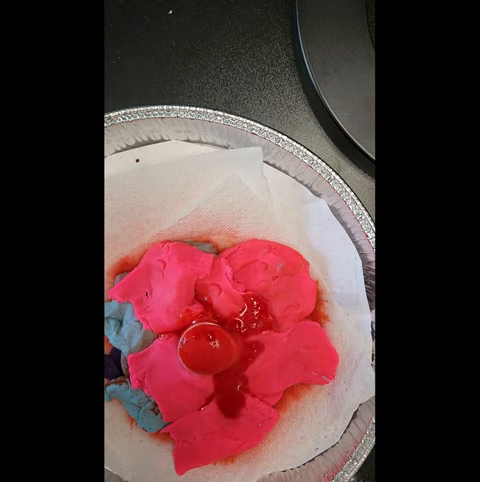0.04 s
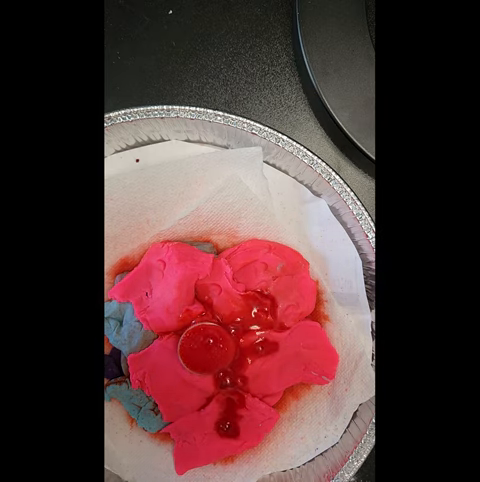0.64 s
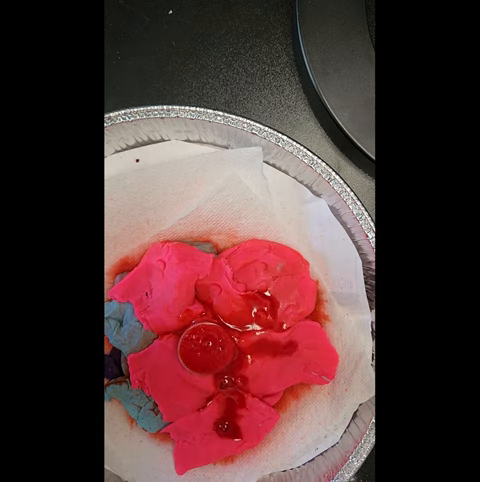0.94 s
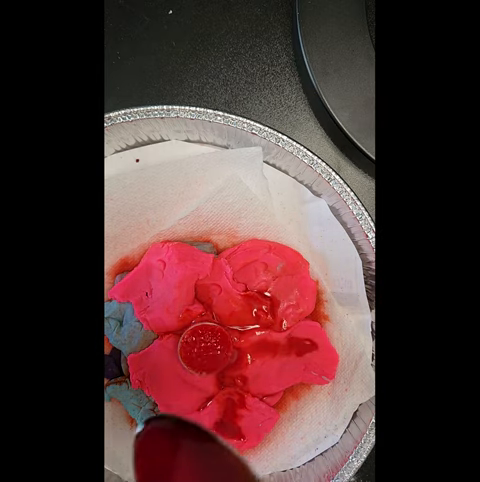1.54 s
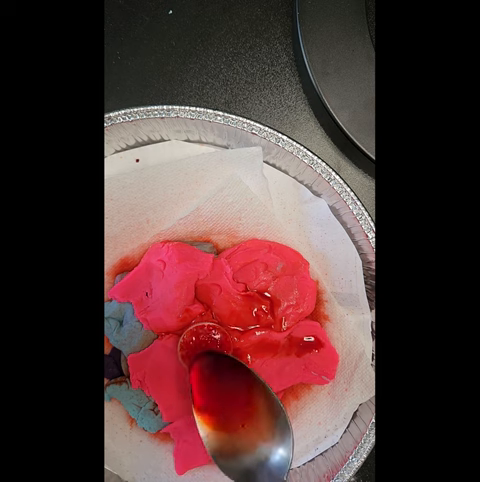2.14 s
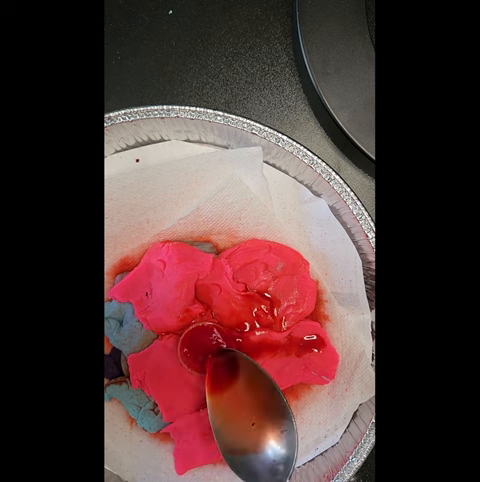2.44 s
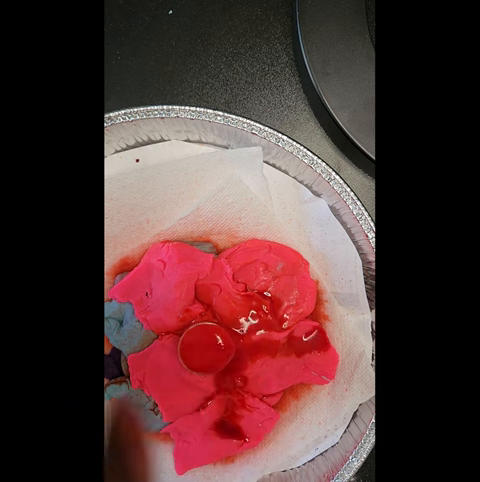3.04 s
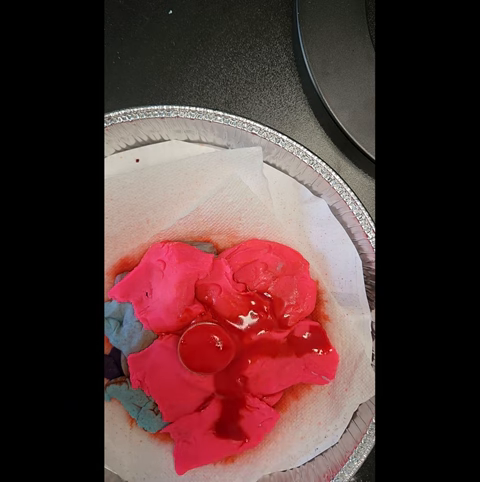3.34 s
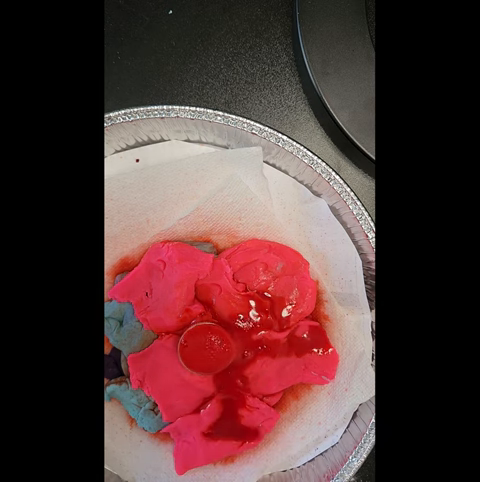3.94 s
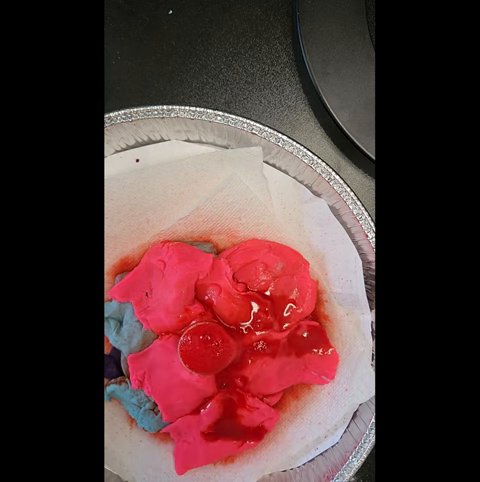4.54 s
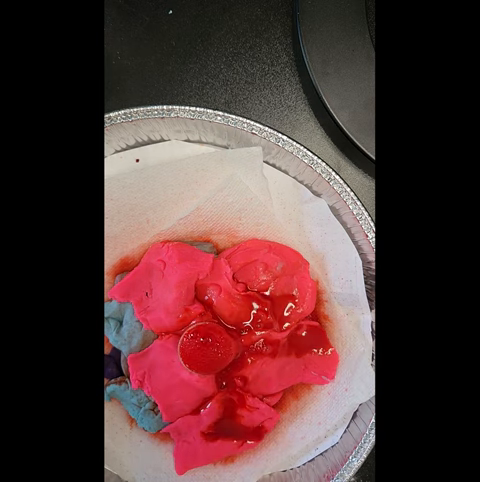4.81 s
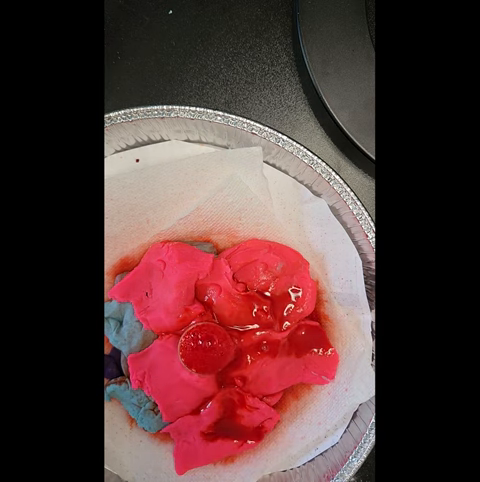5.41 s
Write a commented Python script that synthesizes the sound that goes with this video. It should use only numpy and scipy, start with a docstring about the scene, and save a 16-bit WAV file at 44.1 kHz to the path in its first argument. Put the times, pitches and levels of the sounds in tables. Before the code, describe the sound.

Foam fizzes softly, fading and building again, while a metal spoon is picked up and put down and the table is knocked.

```python
"""Baking soda and vinegar fizz in a small cap and on the dough around it, close to a mono microphone.
Each spoonful builds up and fades, fine bubbles first; the cap falls quiet while the spoon lies over it.
The steel spoon clinks as it is picked up from the tabletop and is laid down again with a clatter.
Things are nudged and slid on the table. The place is a small room with a low appliance hum."""
import sys
import numpy as np
from scipy import signal
from scipy.fft import rfft, irfft, next_fast_len
from scipy.io import wavfile
from scipy.ndimage import map_coordinates

SR = 44100
rng = np.random.default_rng(int(sys.argv[2]) if len(sys.argv) > 2 else 0)


def unload_wav(signal):
    """Save mono or channel-first audio to the path in sys.argv[1] as 16-bit WAV at rate SR, clipped to [-1, 1]."""
    wavfile.write(
        sys.argv[1],
        SR,
        np.round(np.clip(np.atleast_2d(signal).T, -1, 1) * 32767).astype(np.int16),
    )


N = 250039


def amp(db):
    """Decibels to gain."""
    return 10 ** (np.asarray(db) / 20)


def unit(x):
    """x at rms 1."""
    return x / np.sqrt(np.mean(x ** 2) + 1e-20)


def along(points, hz):
    """(Hz, value) points read on a log axis."""
    f, v = np.transpose(points)
    return np.interp(np.log(hz + 1), np.log(f + 1), v)


def wobble(rate):
    """A smooth random curve, rate knots a second."""
    knots = rng.standard_normal(int(N * rate / SR) + 4)
    return map_coordinates(knots, [np.arange(N) * rate / SR])


def filtered(x, response):
    """x times a response of frequency."""
    m = next_fast_len(len(x) + SR // 4)
    return irfft(rfft(x, m) * response(np.fft.rfftfreq(m, 1 / SR)), m)[:len(x)]


def coloured(x, spectrum):
    """x shaped by (Hz, dB) points, at rms 1."""
    return unit(filtered(x, lambda hz: amp(along(spectrum, hz))))


def resonance(x, hz, width, order=1):
    """x through a resonance, order times over, at rms 1."""
    return unit(filtered(x, lambda f: (1j * f * width / (hz * hz - f * f + 1j * f * width)) ** order))


def mode(t, hz, t60):
    """A sine of random phase that falls 60 dB in t60 seconds."""
    return amp(-60 * t / t60) * np.sin(2 * np.pi * (hz * t + rng.random()))


def add(track, s, sound):
    """Mix a sound into the track at time s."""
    part = track[max(round(s * SR), 0):][:len(sound)]
    part += sound[:len(part)]


def pops(rate, spread_db):
    """Random impulses of uneven size, rate a second."""
    size = amp(spread_db * np.clip(rng.standard_normal(N), -2.5, 2.5))
    return unit((rng.random(N) < rate / SR) * size * rng.choice([-1, 1], N))


def room_tone():
    """Low room rumble with the wavering hum of an appliance."""
    # Each row: frequency in Hz, relative level in dB.
    rumble_spectrum = [(11, -45.5), (18, -10), (74, 0.5), (90, -1), (108, -7.5), (144, -0.5), (178, -7),
                       (237, -11), (352, -12.5), (385, -23.5), (550, -22.5), (635, -28.5), (746, -25),
                       (1150, -33), (1300, -36), (1690, -49.5), (2860, -120)]
    # Each row: pitch in Hz, level in dB, width in Hz.
    hum_tones = [(27.5, -61.5, 8), (72.3, -59, 18.4), (141.3, -59.5, 17.6), (234.9, -66, 7.5),
                 (277.7, -67.5, 9.3), (347.8, -68.5, 25)]
    rumble = amp(-52.5 + 0.99 * wobble(5.14)) * coloured(rng.standard_normal(N), rumble_spectrum)
    hum = sum(amp(db) * resonance(rng.standard_normal(N), hz, width, order=2)
              for hz, db, width in hum_tones)
    return rumble + hum


def reverb(x):
    """The near walls answer with a short tail that dies soonest in the top treble."""
    # Each row: frequency in Hz, time to fall 60 dB in seconds.
    decay_times = [(150, 0.28), (1000, 0.31), (4000, 0.33), (9000, 0.35), (15000, .1)]
    hz, t, noise = signal.stft(rng.standard_normal(SR // 2), SR, nperseg=256)
    tail = signal.istft(noise * amp(-60 * t / along(decay_times, hz)[:, None]), SR, nperseg=256)[1]
    delayed = np.pad(x, (round(0.0067 * SR), 0))
    return signal.fftconvolve(delayed, tail / np.linalg.norm(tail))[:N]


def bumps():
    """Soft bumps, each a few low cycles that swell and fade."""
    # Each row: start in seconds, pitch in Hz, level in dB.
    soft_bumps = [(0.425, 78, -40), (1.54, 77, -43), (4.2, 145, -46), (4.75, 145, -43), (5.155, 175, -41)]
    out, t = np.zeros(N), np.arange(SR // 4) / SR
    swell = (t / 0.019) ** 2 * np.exp(2 * (1 - t / 0.018))
    for s, hz, db in soft_bumps:
        add(out, s, amp(db) * swell * np.sin(2 * np.pi * hz * t))
    return out


def slides():
    """Things slide on the table: fine slips excite one resonance of each."""
    # Each row: start and length in seconds, level in dB, resonance and its width in Hz.
    strokes = [(0.062, 0.15, -62, 1020, 270), (0.14, 0.063, -51.5, 3300, 7800),
               (0.47, 0.12, -58.5, 1110, 360), (0.49, 0.029, -54.5, 3200, 2600),
               (3.247, 0.17, -56.5, 2460, 1700), (3.24, 0.24, -65, 740, 410), (5.14, 0.225, -51, 298, 175),
               (5.305, 0.052, -49.5, 340, 170), (5.219, 0.17, -63.5, 1140, 640),
               (5.305, 0.046, -54.5, 4600, 5300)]
    out = np.zeros(N)
    for s, length, db, hz, width in strokes:
        n = int(length * SR)
        slips = resonance(pops(rate=800, spread_db=-1.5)[:n], hz, width, order=2)
        add(out, s, amp(db) * slips * signal.windows.tukey(n, .3))
    return out


def knocks():
    """Dull blows ring the tabletop with a short rattle; harder ones reach its upper modes."""
    # Each row: start in seconds, level in dB, brightness in dB.
    blows = [(3.237, -39.5, -11.5), (4.737, -54, 0), (5.0462, -25, -3), (5.214, -58, 3)]
    # Each row: frequency in Hz, relative level in dB, time to fall 60 dB in seconds.
    table_modes = [(195, -6, .06), (305, 1, .06), (393, 2, .06), (520, -13, .03), (630, -12, .06),
                   (721, -6, .06), (872, -9, .07), (1040, -8.5, .07), (1215, -5, .09), (1560, -11, .075)]
    out, t = np.zeros(N), np.arange(SR // 3) / SR
    for s, db, bright_db in blows:
        hardness = [(400, 0), (1200, bright_db)]
        ring = sum(amp(level + along(hardness, hz)) * mode(t, hz, t60) for hz, level, t60 in table_modes)
        rattle = resonance(rng.standard_normal(len(t)), hz=850, width=990)
        rattle = resonance(rattle, hz=830, width=2000) * amp(-9.5 + bright_db - 60 * t / 0.12)
        attack = 1 - np.exp(-t / .0004)
        add(out, s, amp(db) * (ring + rattle) * attack)
    return out


def spoon():
    """Steel meets table with a chatter, a ring, a hollow knock and a thud; let go, it rings more freely."""
    # Each row: start in seconds, level in dB, treble in dB, knock pitch in Hz, knock's relative dB.
    contacts = [(0.0, -30.5, 6, 840, 5.5), (0.02, -28.5, 8, 870, 3), (0.038, -28.5, 8, 940, 3),
                (0.0452, -26, 12, 1470, 0), (0.051, -30, 0, 540, -3), (3.524, -26.5, 12, 1045, 7.5),
                (3.540, -24.5, 2, 1144, 0), (3.5641, -17, 9.5, 904, -1.5), (3.579, -20, 2, 900, -3.5),
                (3.6098, -6.5, -1.5, 1090, -3), (3.685, -28, -5, 1113, 7)]
    # Each row: frequency in Hz, relative dB lying free and gripped, time to fall 60 dB in seconds.
    steel_modes = [(915, 0, -9, .14), (985, -3, -14, .07), (1098, -2, -12, .08), (1167, -3, -12, .07),
                   (1232, -6, -14, .06), (1410, -2, -13, .11), (1752, -1, -7, .13), (2234, -3, -25, .1),
                   (2282, -3, -25, .1), (2800, -20, -11, .08), (2905, -6, -20, .12), (2997, -5, -16, .11),
                   (3038, -6, -8, .1), (3130, -3, -18, .09), (3245, -5, -20, .08), (3365, 0, -17, .1),
                   (3564, -6, -18, .08), (4080, -15, -9, .07), (4242, -5, -18, .09), (4407, -10, -11, .09),
                   (4630, -5, -16, .09), (4708, 0, -10, .11), (4970, -14, -7, .07), (5403, -4, -15, .12),
                   (6300, -14, -4, .06), (6535, -10, -16, .11), (7570, -11, -9, .08), (8526, -10, -22, .12),
                   (12300, -15, -30, .09), (14900, -10, -32, .07)]
    # Each row: frequency in Hz, relative level in dB.
    chatter_spectrum = [(60, -30), (300, -21), (560, -19), (700, -10), (800, -5), (1050, -1), (1400, -4),
                        (2000, -9), (2600, -9), (3200, -3), (3900, -7), (5000, -5), (6500, -5), (8000, -8),
                        (10000, -20), (14000, -22), (15000, -17)]
    let_go_s, ring_db = 3.6, -14.5
    out, t = np.zeros(N), np.arange(SR // 3) / SR
    for s, db, treble_db, knock_hz, knock_db in contacts:
        gripped = s < let_go_s
        thud_db = -15.5 if gripped else -22.5  # the hand's weight adds to the table's thud
        chatter_db, chatter_t60 = (-1.9, 0.024) if gripped else (-7.5, 0.064)
        hardness = [(1500, 0), (5000, treble_db)]
        ring = np.zeros(len(t))
        for hz, free_db, held_db, t60 in steel_modes:
            mode_db = (held_db if gripped else free_db) + along(hardness, hz) + rng.normal()
            ring += amp(ring_db + mode_db) * mode(t, hz, t60)
        chatter = coloured(coloured(rng.standard_normal(len(t)), chatter_spectrum), hardness)
        chatter *= amp(.5 * treble_db + chatter_db - 60 * t / chatter_t60)
        hollow = amp(knock_db - 3.5) * mode(t, knock_hz, t60=0.036)
        thud = amp(thud_db - 60 * t / .06) * resonance(rng.standard_normal(len(t)), hz=330, width=330)
        attack = 1 - np.exp(-t / .0006)
        add(out, s, amp(db) * (chatter + ring + hollow + thud) * attack)
    return out


def ticks():
    """Larger bubbles burst and small things tick, each a few milliseconds of one broad resonance."""
    # Each row: start in seconds, pitch in Hz, level in dB.
    snaps = [(1.5595, 3450, -40), (3.238, 2700, -46), (4.738, 2400, -50), (4.851, 2100, -51),
             (5.050, 7900, -40), (5.0558, 8100, -34), (5.056, 3500, -40), (5.215, 2500, -45)]
    out, t = np.zeros(N), np.arange(SR // 20) / SR
    for s, hz, db in snaps:
        snap = resonance(rng.standard_normal(len(t)), hz, width=.14 * hz)
        add(out, s, snap * amp(db - 60 * t / .018))
    return out


def cap():
    """Bursts ring the air in the cap, 20 dB quieter while the spoon covers it."""
    cover_s, uncover_s, move_s = 2.3, 2.78, 0.032
    t = np.arange(N) / SR
    covered = (np.tanh((t - cover_s) / move_s) - np.tanh((t - uncover_s) / move_s)) / 2
    air = resonance(pops(rate=600, spread_db=2.5), hz=2962, width=380, order=2)
    return air * amp(-69 - 20 * covered)


def bubble_patches():
    """Bubbles of like size ring in a narrow band that swells, fades and climbs as they shrink."""
    # Each row: loudest moment and half-length in seconds, then pitch in Hz and level in dB at that peak.
    patches = [(0.13, .35, 4590, -58.5), (0.6, .32, 7700, -55.5), (1.09, .21, 8520, -61.5),
               (1.37, .45, 5560, -56.8), (1.83, .13, 6400, -57.7), (1.89, .5, 4350, -63.6),
               (3.2, .42, 7990, -57.7)]
    climb_hz_per_s, spread_hz = 1250, 600
    out, t = np.zeros(N), np.arange(N) / SR
    for s, half_s, hz, db in patches:
        flutter = unit(filtered(pops(rate=5000, spread_db=1.0), lambda f: 1 / (1 + (f / spread_hz) ** 2)))
        pitch = hz + climb_hz_per_s * (t - s)
        tone = np.sqrt(2) * np.cos(2 * np.pi * np.cumsum(pitch) / SR)
        swell = np.exp(-((t - s) / half_s) ** 2)
        out += amp(db) * swell * flutter * tone
    return out


def reaction(size):
    """Gain of one size of bubble: each spoonful builds up and fades, and the livelier one prevails."""
    # Each row: start in seconds (negative: already fizzing), base fade in dB a second, fine bubbles' extra dB.
    spoonfuls = [(-0.62, 3.4, -1.4), (2.63, 1.85, 1.0)]
    # Each size: level in dB, build-up in seconds, factor on the base fade.
    bubble_sizes = {"large": (-59.5, 0.56, 1.1), "medium": (-52.5, 0.27, 0.29), "fine": (-51, 0.2, .9)}
    db, build_s, fade_factor = bubble_sizes[size]
    gain = np.zeros(N)
    for s, fade_db_per_s, fine_db in spoonfuls:
        age = np.maximum(np.arange(N) / SR - s, 0)
        build = 1 - np.exp(-(age / build_s) ** 2)
        fade = amp(fine_db * (size == "fine") - fade_factor * fade_db_per_s * age)
        gain = np.maximum(gain, build * fade)
    return gain * amp(db)


def foam():
    """Thousands of tiny bursts a second merge into a close hiss; the fewer large bubbles sputter."""
    # The hiss of each size of bubble. Each row: frequency in Hz, relative level in dB.
    large_spectrum = [(600, -5.5), (900, -24), (1300, -14), (1650, -1.5), (1900, -4), (2600, -3.3),
                      (3400, -4), (4000, -4.8), (5000, -14.7), (8000, -39)]
    medium_spectrum = [(800, -18), (3400, -14.5), (4000, -4.5), (4600, -2.8), (4950, 1.1), (5600, -0.4),
                       (6300, 1.9), (6900, -3.5), (7400, 1.4), (8500, -3.5), (9500, -6.9), (12000, -10.5)]
    fine_spectrum = [(1000, -16.4), (4000, -26), (7500, -0.5), (9000, -0.5), (9700, -5), (10250, 0),
                     (11300, -2.5), (12400, 0), (13700, 0), (14900, -1.5), (15700, 0.2)]
    sputter = amp(2.05 * wobble(22.31))
    large = coloured(pops(rate=2500, spread_db=0.5), large_spectrum) * sputter
    medium = coloured(pops(rate=7000, spread_db=3.5), medium_spectrum) * amp(0.46 * wobble(12))
    fine = coloured(pops(rate=19000, spread_db=3.0), fine_spectrum) * amp(.25 * wobble(12))
    return large * reaction("large") + medium * reaction("medium") + fine * reaction("fine")


def scene():
    """Fizz up close, handling noises on the table and the room behind, alike in both channels."""
    steel, wood = spoon(), knocks()
    reflections = amp(-14.5) * reverb(steel) + amp(-9) * reverb(wood)
    handling = steel + wood + reflections + ticks() + slides() + bumps()
    mono = foam() + cap() + bubble_patches() + handling + room_tone()
    return np.array([mono, mono])


def record(dry):
    """The recorder cuts off steeply at its band limit."""
    top_hz = 15800
    return np.array([filtered(channel, lambda hz: 1 / np.sqrt(1 + (hz / top_hz) ** 400))
                     for channel in dry])


dry = scene()
out = record(dry)
unload_wav(out)
```